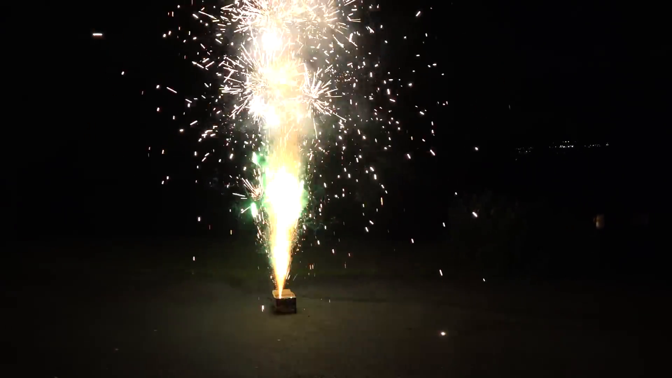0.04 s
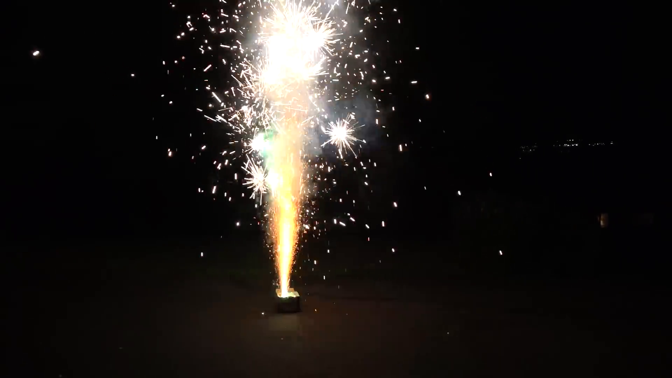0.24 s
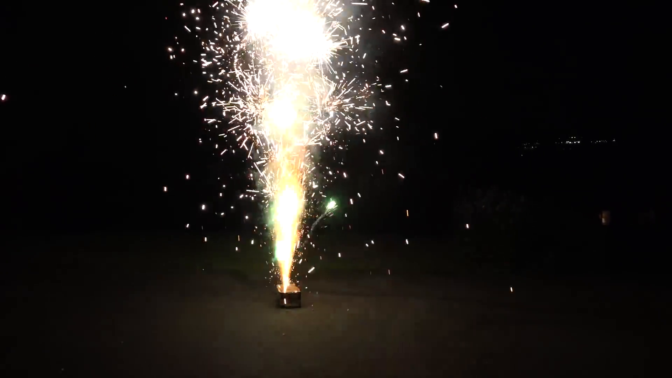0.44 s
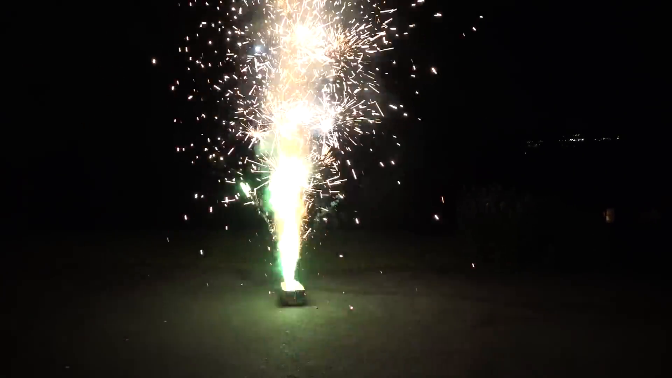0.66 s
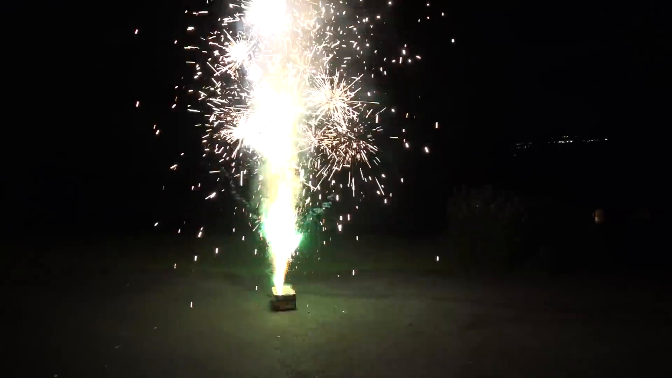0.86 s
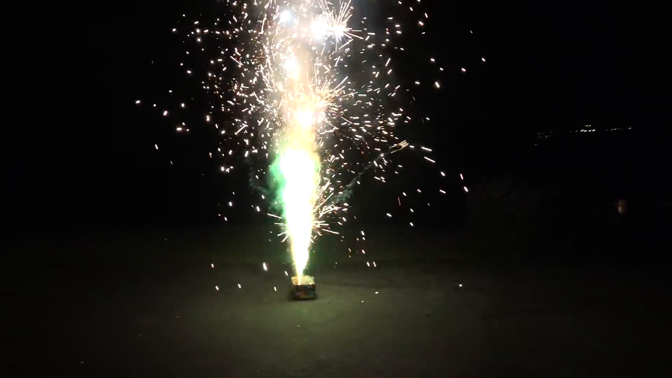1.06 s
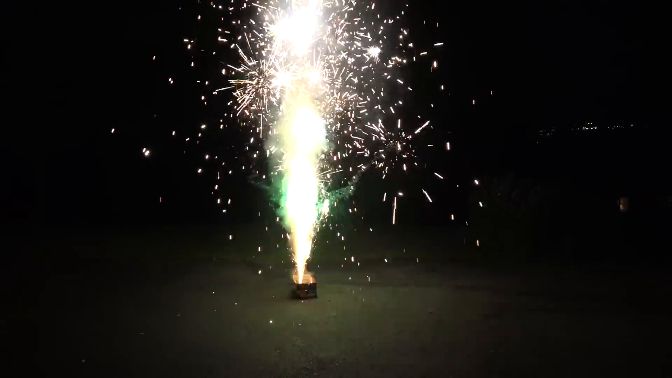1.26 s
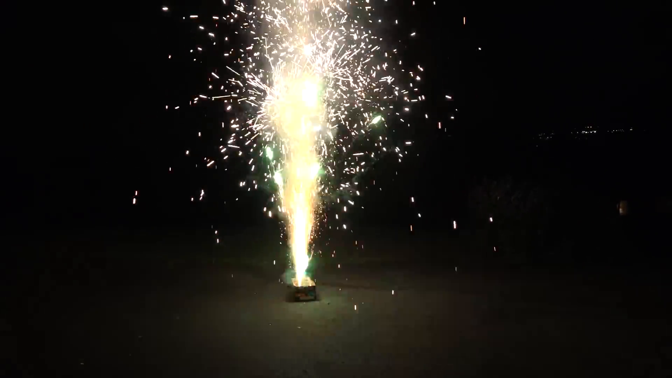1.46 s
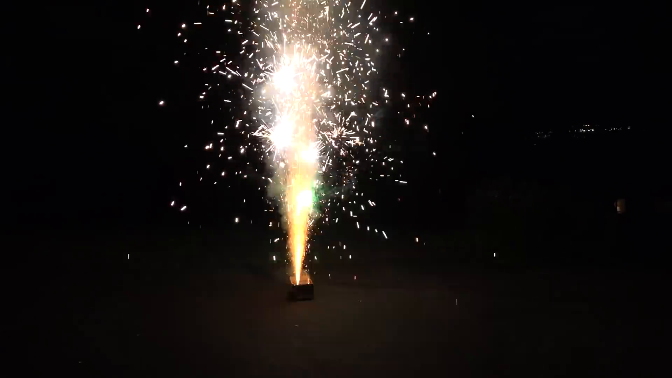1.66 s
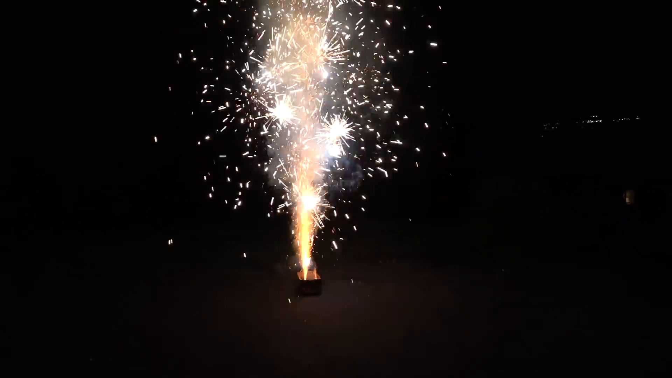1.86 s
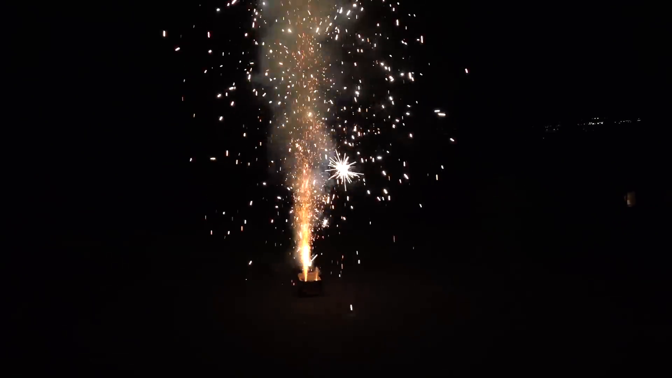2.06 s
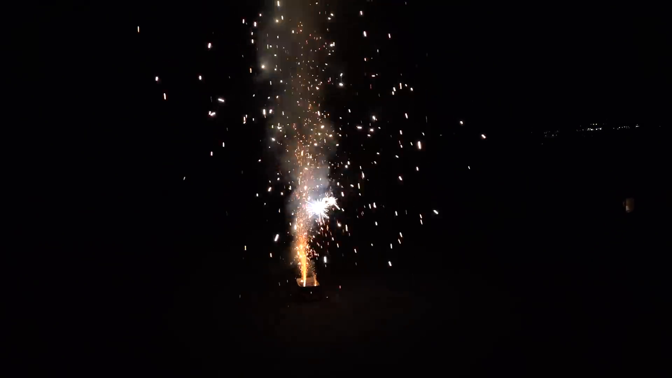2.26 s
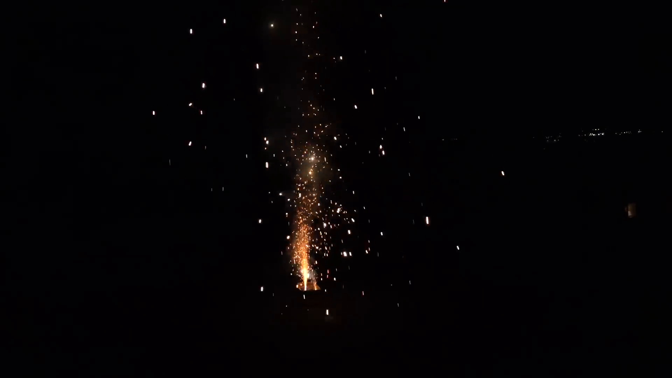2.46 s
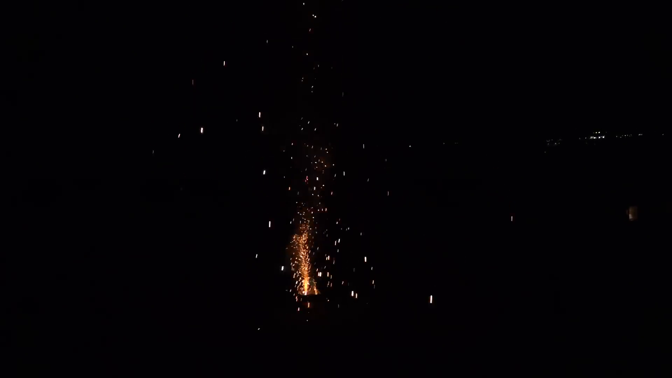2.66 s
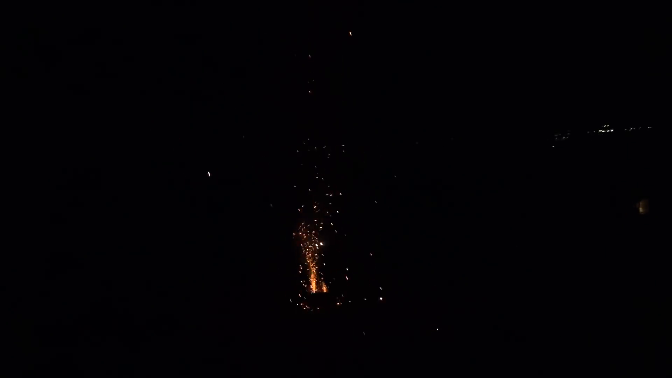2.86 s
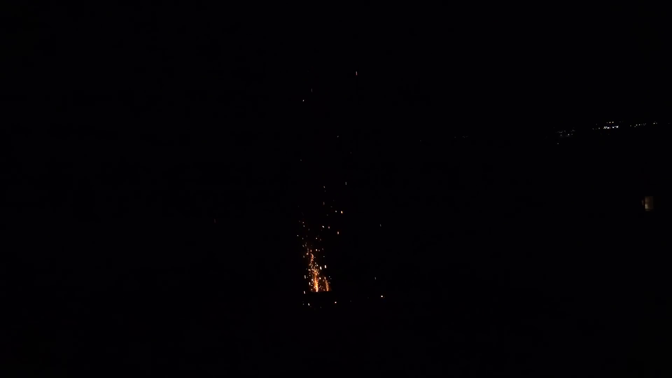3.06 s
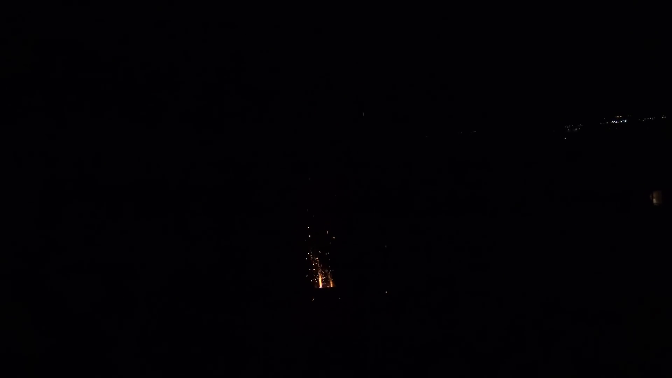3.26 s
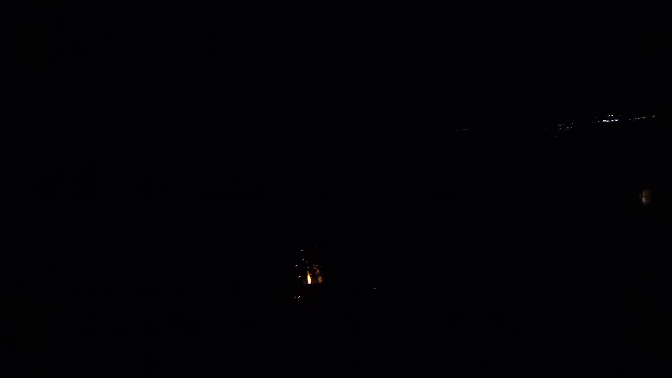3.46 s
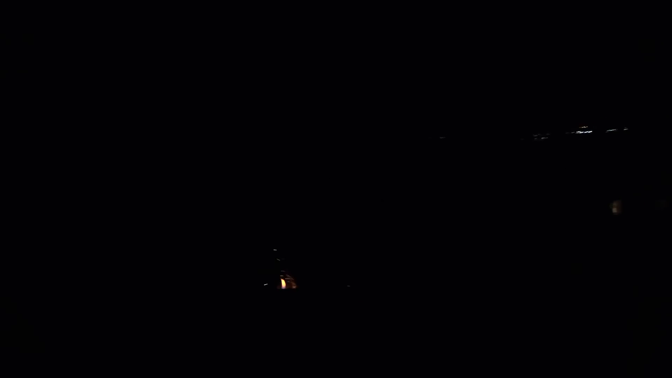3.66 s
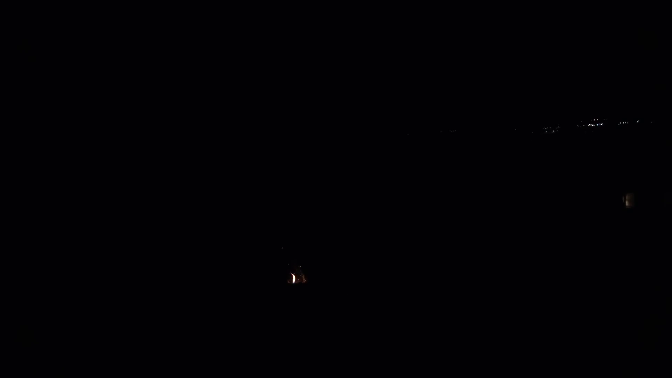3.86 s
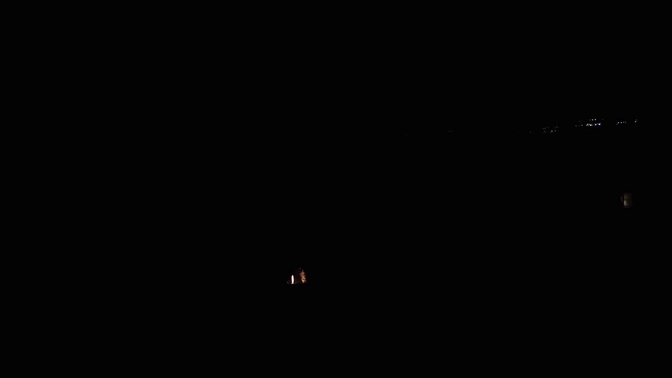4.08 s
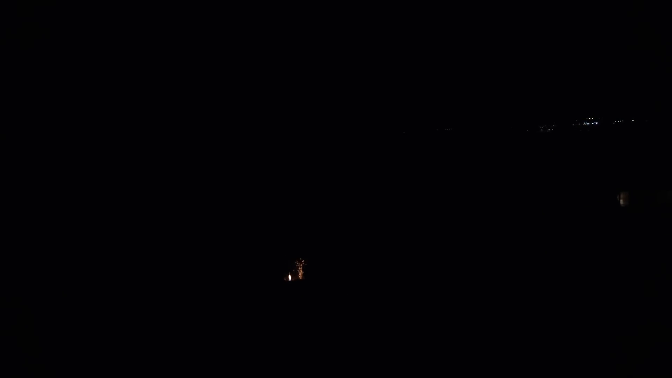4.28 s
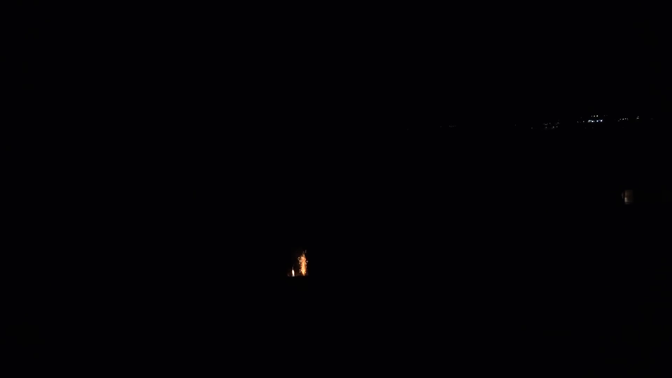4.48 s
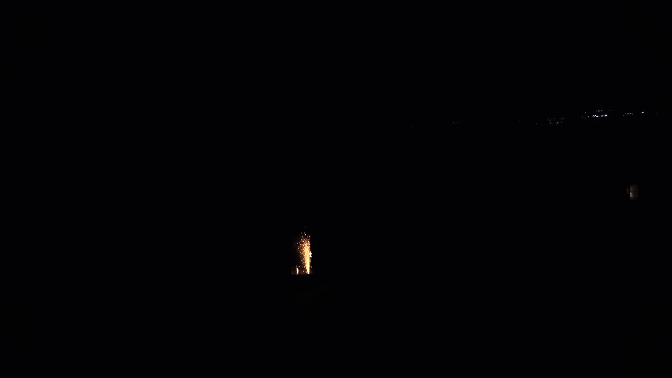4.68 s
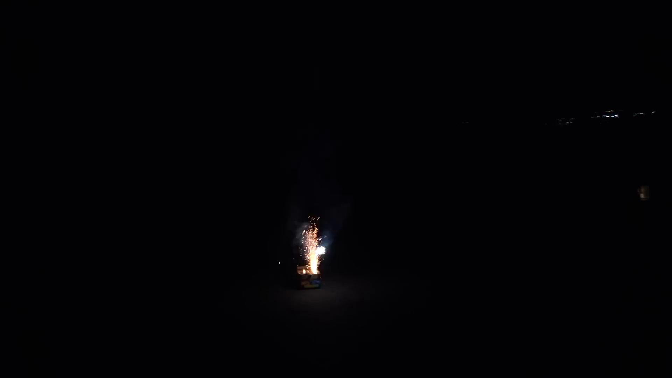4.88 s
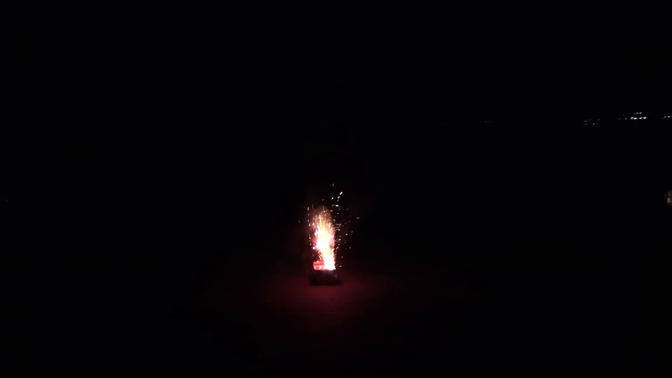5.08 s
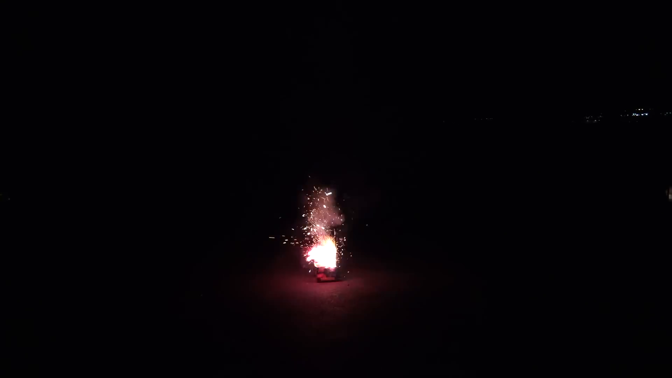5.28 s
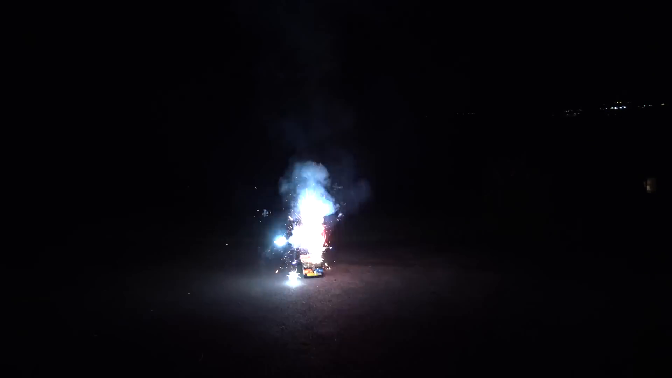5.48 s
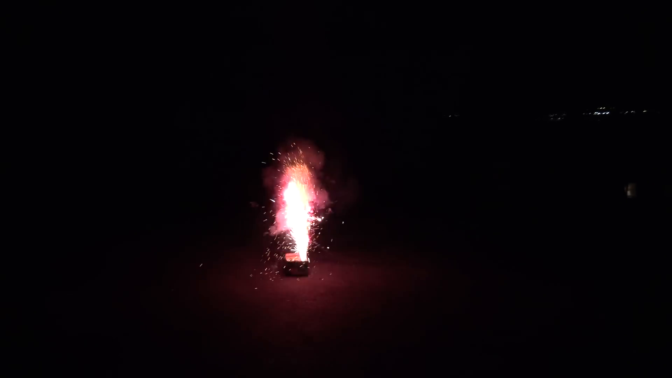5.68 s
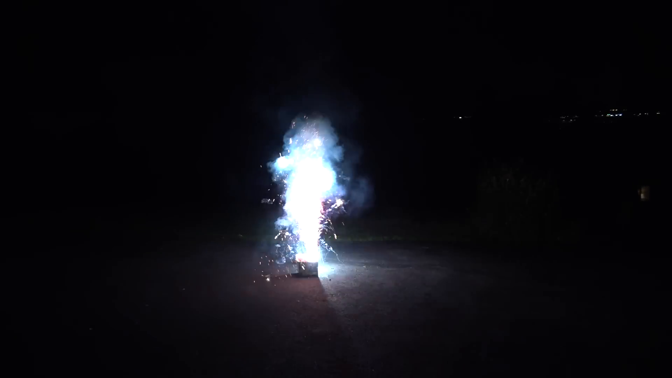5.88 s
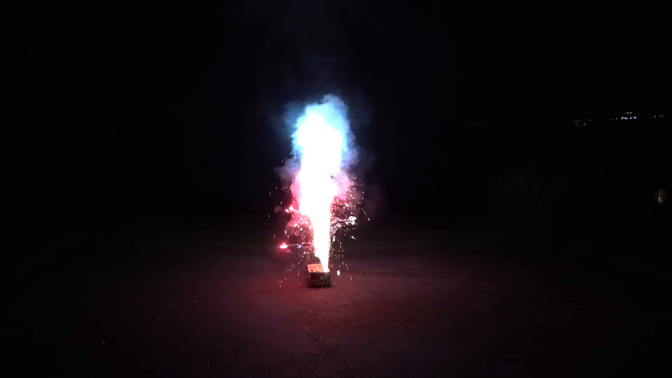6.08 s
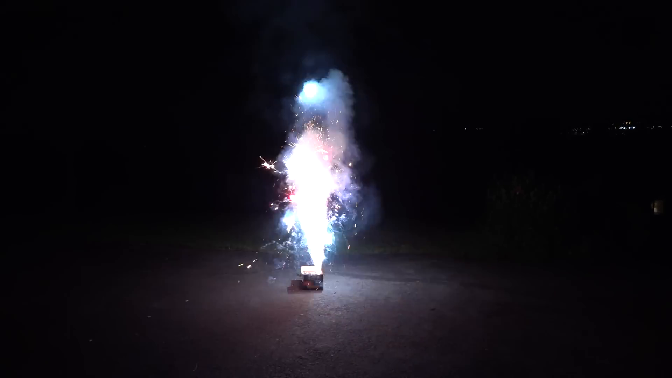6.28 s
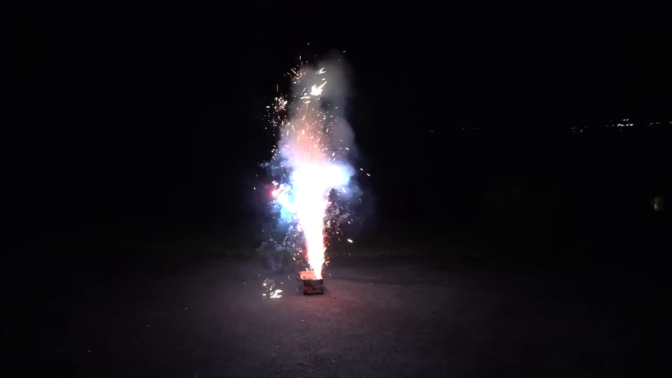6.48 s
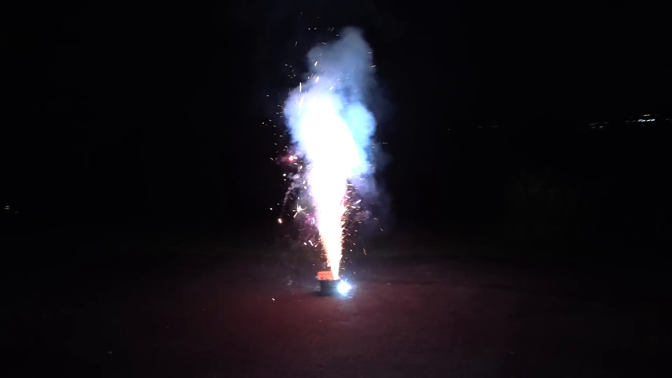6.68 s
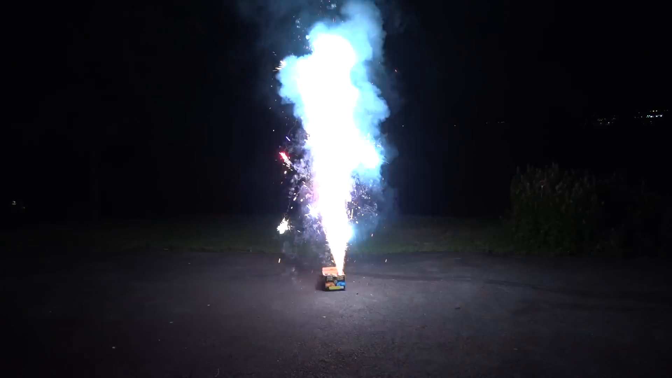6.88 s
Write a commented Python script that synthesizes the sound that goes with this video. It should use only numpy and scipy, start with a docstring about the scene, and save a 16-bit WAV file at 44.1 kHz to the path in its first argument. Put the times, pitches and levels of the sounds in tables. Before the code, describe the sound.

Dense crackling sparks from a ground firework die away, a far engine drones, and the firework reignites, popping into a fluttering roar.

```python
"""A ground firework fountain at night: a hissing jet throws sparks that burst in a dense crackle.
The charge burns out, and a faint fizz creeps through the cardboard tube while an engine drones far off.
Then the next charge catches with a fizz, hollow pops of burning lumps and low thumps of gas,
and swells into a fluttering roar. The yard and a wall across it add a thin echo."""
import sys
import numpy as np
from scipy import signal
from scipy.fft import rfft, irfft
from scipy.io import wavfile

SR = 44100
rng = np.random.default_rng(int(sys.argv[2]) if len(sys.argv) > 2 else 0)


def to_wav(s):
    """Save 16-bit WAV."""
    ch = np.atleast_2d(s).T  # columns
    pcm = np.round(np.clip(ch, -1, 1) * 32767)  # PCM
    wavfile.write(sys.argv[1], SR, pcm.astype(np.int16))


N = 306045
TIME = np.arange(N) / SR

# The first charge's shower of sparks surges and chokes: time_s, strength_db
SHOWER_STRENGTH = [(0.0, -29), (0.01, -25.5), (0.104, -28.5), (0.344, -23), (0.36, -28.5), (0.46, -25.5),
                   (0.476, -36.5), (0.528, -24), (0.632, -24.5), (0.648, -34), (0.664, -25), (0.836, -23.5),
                   (0.852, -33.5), (0.868, -24.5), (0.952, -27), (0.959, -21), (0.969, -44), (0.978, -22.5),
                   (1.001, -23), (1.011, -34), (1.02, -23.5), (1.146, -28), (1.246, -22.5), (1.386, -27),
                   (1.408, -20.5), (1.434, -27), (1.644, -23.5), (1.648, -34), (1.706, -21.5),
                   (1.716, -38.5), (1.737, -23.5), (1.88, -29.5)]
# Big sparks, called stars, burst with one sharp crack each: start_s, level_db
STAR_BURSTS = [(.2184, -5), (.3447, -7.5), (.4266, -3.5), (.457, -9.5), (.529, -8), (.575, -12),
               (.7492, -20), (.7887, -16), (.8654, -9), (.9782, -23), (.9844, -17), (1.1248, -10),
               (1.2027, -3.5), (1.2246, -9), (1.3087, -11), (1.3276, -12), (1.4, -11), (1.4464, -13),
               (1.4614, -7), (1.7639, -12), (1.7938, -20), (1.8137, -12), (1.851, -7), (1.8671, -14),
               (1.8759, -14), (1.8835, -12), (1.9693, -22), (1.975, -10), (1.977, -15), (1.9941, -16),
               (1.9969, -9), (2.0014, -15), (2.0038, -6), (2.0054, -31), (2.0091, -26), (2.0261, -9.5),
               (2.0274, -15), (2.0284, -10), (2.0346, -14), (2.0378, -17), (2.1676, -25), (2.1743, -14),
               (2.1764, -12.5)]
# Burning lumps pop as the tube spits them out:
# start_s, snap_db, bubble_pitch_hz, bubble_db, cavity_pitch_hz, cavity_db, sizzle_db
LUMP_POPS = [(0.8356, -17, 520, -26, 2000, -31, -29), (1.9032, -20, 650, -29.5, 4770, -21, -40),
             (2.1312, -36, 620, -38, 4500, -41, -52), (2.276, -38, 613, -42, 4470, -58.5, -59),
             (2.3838, -49, 710, -35, 4470, -33, -54), (2.3922, -53, 705, -37, 4600, -33.5, -54),
             (2.795, -48, 900, -49, 4700, -43, -49), (4.6324, -45, 700, -44, 1800, -38, -45),
             (4.6788, -37, 957, -35, 4540, -29, -48), (4.6952, -34, 770, -34, 4700, -34, -43),
             (4.7935, -32, 860, -32.5, 4460, -26, -40), (4.889, -36, 706, -32, 4830, -30, -40),
             (4.8989, -33, 950, -28, 4630, -30, -40), (4.9214, -22, 800, -44, 3840, -29, -39),
             (4.9651, -29, 800, -38, 1830, -31, -38), (5.0639, -25, 800, -35, 1880, -34, -34),
             (5.1152, -49, 600, -46, 1610, -40, -54), (5.152, -32, 1000, -24.5, 2300, -47, -34),
             (5.232, -37, 1020, -31, 1740, -36, -36), (5.2841, -28, 800, -36, 3950, -21, -40),
             (5.3774, -20, 840, -25, 1720, -31, -39), (5.3864, -24, 760, -28, 3530, -30, -40),
             (5.447, -31.5, 800, -34, 3510, -27, -52), (5.473, -21, 870, -24.5, 1290, -33, -35),
             (5.5197, -33, 835, -24, 4000, -24, -32.5), (5.6867, -21, 795, -27, 3600, -24, -35),
             (5.7116, -24, 750, -19.5, 1280, -33, -38), (5.9197, -17, 870, -17, 2150, -24, -29.5),
             (5.939, -27, 920, -19.5, 2680, -25, -36), (5.9477, -15, 700, -37, 2350, -25, -39),
             (6.123, -17, 980, -20.5, 3080, -25, -34), (6.248, -20, 980, -19, 4540, -28, -32),
             (6.3201, -9, 760, -23, 5200, -23, -31), (6.3445, -17, 850, -22, 2400, -21, -33),
             (6.3512, -11, 700, -23, 2420, -25, -35), (6.448, -9, 730, -29, 3510, -35, -42),
             (6.4508, -13, 735, -38, 3510, -36, -41), (6.4562, -11.5, 990, -26, 3600, -30, -30),
             (6.4868, -15, 470, -29, 4830, -21, -30), (6.7119, -11, 800, -35, 4600, -30, -28),
             (6.754, -11, 716, -19, 1490, -21.5, -28), (6.788, -12, 800, -21, 2400, -26, -34)]
# The far engine speeds up and grows louder: time_s, firing_rate_hz, level_db
ENGINE_RUN = [(1.9, 94.5, -62), (2.402, 100, -54.5), (3.001, 106.5, -52), (4.1, 114.1, -51),
              (6.94, 121.2, -47)]
# The engine's tones: multiple_of_firing_rate, level_db
ENGINE_TONES = [(1, -4.5), (2, -20.5), (3, -22.5)]
# Gulps of gas leave the tube: start_s, pitch_hz, level_db
GAS_GULPS = [(2.385, 560, -43), (4.889, 260, -33), (4.966, 249, -24), (5.067, 208, -24.5),
             (5.118, 243, -34), (5.154, 228, -27), (5.224, 204, -26.5), (5.267, 230, -26),
             (5.394, 250, -24.5), (5.522, 269, -28), (5.687, 237, -26), (5.7, 207, -19),
             (5.761, 220, -20.5), (5.845, 240, -22.5), (5.922, 239, -16.5), (5.948, 287, -21),
             (6.233, 255, -20.5), (6.251, 228, -25), (6.306, 266, -17), (6.348, 245, -22),
             (6.377, 235, -24), (6.620, 214, -16)]
# The fire in the tube flares and sinks back: start_s, length_s, boost_db
FIRE_FLARES = [(2.93, 0.34, 3.5), (3.513, 0.63, 2.5), (4.872, 0.13, 3), (5.23, 0.37, 3.5),
               (5.498, 0.1, 2.5), (5.614, 0.48, 3.5), (6.05, 0.35, 2)]
# The sinking sizzle of the primer, which lights the second charge: time_s, pitch_hz
PRIMER_PITCH = [(4.6, 4700), (4.79, 4550), (4.87, 4170), (5.1, 4020), (5.398, 3600)]
# Where the tube rings: pitch_hz, width_hz, boost_db
TUBE_RINGS = [(2380, 320, 2.5), (3600, 210, 8), (4620, 210, 8), (8000, 300, 6.5)]

# Each sound's tone colour, or how strong it is from bass to treble: frequency_hz, level_db
JET_SPECTRUM = [(30, -18), (120, -11), (250, -11.5), (600, -6.5), (1600, -6), (3200, -1.5), (4600, 1),
                (5800, 1), (6900, -5), (8100, -2), (9300, -8), (11000, -17.5)]  # gas rushing from the nozzle
CRACK_SPECTRUM = [(30, -42), (120, -13), (260, 1.5), (450, -5.5), (700, -1), (2000, -0.5), (3200, -2),
                  (5600, 3.5), (6300, 1), (6880, -9.5), (7850, 3.5), (8400, 2), (9300, -5.5), (11000, -15)]  # a spark bursting
SPLINTER_SPECTRUM = [(60, -20), (250, 0.5), (700, -10), (2000, 2), (5500, 0), (6900, -17), (8100, 0),
                     (11000, -23)]  # a star breaking up
POP_SPECTRUM = [(30, -13), (130, -8), (300, -3), (800, -4), (1500, 6), (2400, 3), (4600, 2), (5800, 6),
                (6750, -21), (7500, -10), (8600, -10.5), (11000, -24)]  # a lump snapping
SIZZLE_SPECTRUM = [(100, -31), (400, -9), (900, 1), (1500, 2), (2400, 10), (3500, 2), (4400, 2), (5500, 7),
                   (6800, -0.5), (8000, 3), (11000, -14)]  # crumbs inside the tube
RUMBLE_SPECTRUM = [(20, -30), (55, -12), (85, -5.5), (135, -1), (210, -3), (265, -14.5), (350, -14.5),
                   (430, -23.5), (900, -23), (3000, -50)]  # the far engine
FIZZ_SPECTRUM = [(200, -14), (500, -13), (850, -1.5), (1300, -4), (2000, -9), (2500, -2), (3550, -1),
                 (4100, -0.5), (4600, -2.5), (5600, -6.5), (6750, -15), (7900, -11), (9000, -19),
                 (11000, -48)]  # the creeping fire
PRIMER_SPECTRUM = [(200, -7), (500, -13), (800, 2), (1300, -5), (2000, -2), (2600, 3.5), (3400, 6),
                   (4500, 4.5), (5500, -2.5), (6600, -13.5), (7700, -3), (9000, -17), (9700, -32),
                   (11000, -37)]  # the primer's fizz
FLAME_SPECTRUM = [(400, -20), (1200, -19.5), (1900, -6.5), (3000, -0.5), (3300, -6), (4200, -3.5),
                  (5000, -9), (5800, -8.5), (6750, -13), (7300, -10), (8500, -16), (9600, -22.5),
                  (11000, -32)]  # the second charge's hiss
ROAR_SPECTRUM = [(25, -38), (70, -12.5), (160, -2), (280, -3), (480, -7), (750, -4.5), (1000, -9.5),
                 (1500, -12.5), (2500, -26.5), (6000, -68)]  # its low roar, and the puff of each pop

# How long the yard's echo takes to fade by 60 dB: frequency_hz, fade_s
YARD_FADE = [(150, 0.95), (1000, 0.19), (4000, 0.72), (10000, 0.026)]
# How strong the left-right difference is against what both sides share: frequency_hz, difference_db
SPRAY_WIDTH = [(60, 3), (130, 2.5), (250, -6.5), (700, -10.5), (1200, -19.5), (2200, -27), (3200, -29),
               (4000, -25), (5300, -19.5), (6300, -12), (7100, -4), (7800, -7.5), (8900, -7), (11000, -3)]  # sparks high up
GROUND_WIDTH = [(60, -21), (180, -19), (340, -27), (800, -17), (1150, -20.5), (2200, -30), (3000, -26),
                (3600, -28), (4200, -24), (5300, -20), (6200, -8), (6900, -7), (7800, -12), (8900, -7),
                (11000, -1.5)]  # the tube on the ground
ENGINE_WIDTH = [(100, -29.0), (400, -12.0), (1500, -10)]  # the engine, arriving by many paths
# How much louder the left side is than the right: frequency_hz, level_db
LEFT_BOOST = [(60, 1.5), (150, -1.1), (650, 1.3), (1100, -.1), (2200, -.1), (3500, -.3), (5300, -.1),
              (6500, -1.5), (7000, 7), (7600, 1.2), (8600, 4.2), (11000, 1.5)]
# How far the left side's wave runs ahead of the right's: frequency_hz, lead_radians
LEFT_LEAD = [(4800, -0.066), (6000, 0.052), (6800, 0.38), (7500, 0.49), (8200, 0.18), (9200, -0.16),
             (10500, -1)]

BURNOUT_S, LAST_SPARKS_S = 1.825, 1.865  # the first charge's jet fails, then its sparks
ALIGHT_S, CATCH_DB_PER_S = 4.8, 64  # when the second charge is alight, and how fast it gets there
HISS_DB, HISS_DB_PER_S = -50.5, 11.5  # its hiss: level once alight, and growth
TREBLE_LIMIT_HZ = 11100


def amp(db):
    """Turns decibels into a gain to multiply by."""
    return 10 ** (np.asarray(db) / 20)


def normalised(x):
    """Scales a signal to an average (rms) level of 1."""
    return x / np.sqrt(np.mean(x ** 2) + 1e-20)


def look_up(table, hz):
    """Reads between a table's rows, giving every octave equal room."""
    row_hz, value = np.transpose(table)
    return np.interp(np.log(hz + 1), np.log(row_hz + 1), value)


def wander(hz):
    """A random wobble of level 1, mostly slower than the given rate."""
    f = np.fft.rfftfreq(N, 1 / SR)
    white = rfft(rng.standard_normal(N))
    return normalised(irfft(white * f / (f + hz / 10) / (1 + (f / hz) ** 2), N))


def colour(x, spectrum, size=4096):
    """Gives a sound a tone colour; a click of height 1 still peaks at 1."""
    hz = abs(np.fft.fftfreq(size, 1 / SR))
    log_gain = np.log(amp(look_up(spectrum, hz)))
    log_gain -= 2 * np.clip((hz - TREBLE_LIMIT_HZ) / 2000, 0, 1)
    # this step makes the filter ring only after a click, never before it
    kernel = np.fft.ifft(np.exp(np.conj(signal.hilbert(log_gain)))).real[:size // 2]
    return signal.oaconvolve(x, kernel[None] / abs(kernel).max(), axes=1)[:, :N]


def noise(spectrum):
    """Noise of level 1 in two rows: what left and right share, and how they differ."""
    return normalised(colour(rng.standard_normal((2, N)), spectrum))


def shocks(sizes, spectrum):
    """Sharp jumps in air pressure, each leaning left or right at random."""
    sides = rng.choice([-1., 1.], N)
    return colour(-sizes * np.array([np.ones(N), sides]), spectrum)


def grains(per_s, spread_db, spectrum):
    """A crackle of level 1: small random shocks, a few larger than the rest."""
    sizes = amp(spread_db * np.minimum(rng.exponential(1, N), np.pi))
    return normalised(shocks(sizes * (rng.random(N) < per_s / SR), spectrum))


def clicks(rows):
    """One click for each row of start_s, level_db."""
    start_s, db = np.transpose(rows)
    return np.bincount(np.clip(np.round(start_s * SR).astype(int), 0, N - 1), amp(db), N)


def dying(rows, decay_s):
    """A gain that jumps at each row of start_s, level_db and dies away."""
    return signal.lfilter([1], [1, -np.exp(-1 / (decay_s * SR))], clicks(rows) + 1e-12)


def hold(start_s, end_s, rise_db_per_s, fall_db_per_s):
    """A gain that reaches 1 at start_s, stays there and falls after end_s."""
    early_s, late_s = np.maximum(start_s - TIME, 0), np.maximum(TIME - end_s, 0)
    return amp(-rise_db_per_s * early_s - fall_db_per_s * late_s)


def add(mix, start_s, sound):
    """Places a sound in the row that left and right share."""
    part = mix[0, round(start_s * SR):][:len(sound)]
    part += sound[:len(part)]


def flow(usual_db=-24):
    """The flow through the nozzle surges and chokes; 1 is its usual strength."""
    time_s, db = np.transpose(SHOWER_STRENGTH)
    return amp(np.interp(TIME, time_s, db) - usual_db)


def jet(hiss_db=-31.0, crackle_db=-30.5, flutter_db=1.4, sag_db_per_s=0.97):
    """Gas and tiny crackling sparks rush out of the nozzle until the first charge is spent."""
    hiss = amp(hiss_db) * noise(JET_SPECTRUM)
    crackle = amp(crackle_db) * grains(per_s=1800, spread_db=9.0, spectrum=JET_SPECTRUM)
    strength = hold(0, BURNOUT_S, 0, fall_db_per_s=46) * flow() ** 0.36
    return (hiss + crackle) * strength * amp(flutter_db * wander(hz=40) - sag_db_per_s * TIME)


def sparks(per_s=470, top_db=-7.5, range_db=17.5, splinter_db=-15.0, ember_db=-42):
    """Sparks burst in clumps; the big stars also splinter and leave hissing embers."""
    clumps = np.exp(.33 * wander(hz=130))
    shower = hold(0, LAST_SPARKS_S, 0, fall_db_per_s=430) * flow()
    rate = per_s * shower ** 2 * clumps / clumps.mean()  # more flow means more cracks, not louder ones
    sizes = amp(top_db - range_db * rng.random(N)) * (rng.random(N) < rate / SR)
    splinters = amp(splinter_db) * dying(STAR_BURSTS, decay_s=.0025) * grains(3000, 3.2, SPLINTER_SPECTRUM)
    embers = amp(ember_db) * dying(STAR_BURSTS, decay_s=.049) * noise(JET_SPECTRUM)
    return shocks(sizes + clicks(STAR_BURSTS), CRACK_SPECTRUM) + splinters + embers


def tube(x):
    """The cardboard tube rings at a few pitches, boosting them in a sound that passes through."""
    return x + sum((amp(db) - 1) * signal.lfilter(*signal.iirpeak(hz, hz / width_hz, SR), x)
                   for hz, width_hz, db in TUBE_RINGS)


def knock(hz, cycles):
    """A hollow tone that swells over the given number of cycles and quickly dies."""
    turns = hz * TIME[:SR // 25]
    return np.sin(2 * np.pi * turns) * turns / cycles * np.exp(1 - turns / cycles)


def pops(snap_gain_db=-1, sizzle_gain_db=1, puff_gain_db=-13):
    """A lump snaps: its bubble of hot gas swings and puffs, its cavity rings, its crumbs sizzle."""
    times, snap_db, _, bubble_db, _, _, sizzle_db = np.transpose(LUMP_POPS)
    tones = np.zeros((2, N))
    for start_s, _, bubble_hz, db, cavity_hz, cavity_db, _ in LUMP_POPS:
        bubble = amp(db) * knock(bubble_hz, cycles=0.56)
        cavity = amp(cavity_db) * knock(cavity_hz, cycles=1.66)
        add(tones, start_s, bubble - cavity)
    snaps = amp(snap_gain_db) * tube(shocks(clicks(np.c_[times, snap_db]), POP_SPECTRUM))
    crumbs = normalised(tube(grains(3500, 3.5, SIZZLE_SPECTRUM)))
    sizzle = amp(sizzle_gain_db) * dying(np.c_[times, sizzle_db], decay_s=0.01) * crumbs
    puffs = amp(puff_gain_db) * dying(np.c_[times, bubble_db], decay_s=0.013) * noise(ROAR_SPECTRUM)
    return snaps + tones + sizzle + puffs


def engine(rumble_db=2.5, throb_db=3.0, hum_hz=161, hum_db=-8):
    """A far engine slowly gains speed: wavering low tones in a dull rumble, beside a separate hum."""
    time_s, firing_hz, level_db = np.transpose(ENGINE_RUN)
    pace = 1 + 0.0083 * wander(hz=6.2)
    firings = np.cumsum(np.interp(TIME, time_s, firing_hz) * pace) / SR
    tones = [(multiple * firings, db) for multiple, db in ENGINE_TONES]
    tones.append((np.cumsum(hum_hz * pace) / SR, hum_db))
    sound = amp(rumble_db) * noise(RUMBLE_SPECTRUM)
    for turns, db in tones:
        sound[0] += amp(db + throb_db * wander(hz=3.8)) * np.sqrt(2) * np.sin(2 * np.pi * turns)
    return sound * amp(np.interp(TIME, time_s, level_db))


def thumps(swell_s=0.0012):
    """Gulps of gas leave the tube with a short, low whump."""
    sound, t = np.zeros((2, N)), TIME[:SR // 25]
    swell = t / swell_s * np.exp(1 - t / swell_s)
    for start_s, hz, db in GAS_GULPS:
        add(sound, start_s, amp(db) * np.cos(2 * np.pi * hz * t) * swell)
    return sound


def flaring():
    """The gain of the fire's flares: each swells quickly and sinks back."""
    boost_db = 0
    for start_s, length_s, db in FIRE_FLARES:
        progress = np.clip((TIME - start_s) / length_s, 0, 1)
        boost_db += db * np.sqrt(np.sin(np.pi * progress).clip(0))
    return amp(boost_db)


def fizz(level_db=-58, full_s=2.486, fade_db_per_s=25, flutter_db=1):
    """The fire creeps on inside the tube, which colours its faint hiss."""
    hiss = normalised(tube(noise(FIZZ_SPECTRUM)))
    creep = amp(level_db) * hold(full_s, ALIGHT_S, fade_db_per_s, fade_db_per_s)
    return hiss * creep * flaring() * amp(flutter_db * wander(hz=30))


def resonate(x, hz, width_hz):
    """Picks out a narrow band of a sound around a moving pitch."""
    spin = np.exp(2j * np.pi * np.cumsum(hz) / SR)
    decay = np.exp(-np.pi * width_hz / SR)
    return 2 * (spin * signal.lfilter([1 - decay], [1, -decay], x / spin)).real


def primer(level_db=-44.0, full_s=4.72, sizzle_db=-5.0, flutter_db=2.5):
    """The second charge's primer fizzes up; its sizzle wavers and sinks as the vent burns open."""
    time_s, hz = np.transpose(PRIMER_PITCH)
    gas = noise(PRIMER_SPECTRUM)
    pitch_hz = np.interp(TIME, time_s, hz) * (1 + 0.017 * wander(hz=22))
    sizzle = amp(sizzle_db) * resonate(gas, pitch_hz, width_hz=480)
    swell = hold(full_s, full_s, rise_db_per_s=50, fall_db_per_s=9) * flaring()
    return normalised(gas + sizzle) * swell * amp(level_db + flutter_db * wander(hz=30))


def burning(alight_db, db_per_s):
    """The gain of the second charge: it catches, grows steadily and flares now and then."""
    age_s = TIME - ALIGHT_S
    catching_db = CATCH_DB_PER_S * np.minimum(age_s, 0)
    growing_db = db_per_s * np.maximum(age_s, 0)
    return amp(alight_db + catching_db + growing_db) * flaring()


def flame(flutter_db=2.0, spit_db=-11.0, spits_per_s=260):
    """The second charge hisses; uneven burning shakes its roar and spits small grains in spurts."""
    flutter = wander(hz=50)
    blast = burning(alight_db=-48.5, db_per_s=10.5)
    hiss = normalised(tube(noise(FLAME_SPECTRUM))) * burning(HISS_DB, HISS_DB_PER_S)
    roar = noise(ROAR_SPECTRUM) * blast * amp(flutter_db * flutter)
    spits = tube(grains(spits_per_s * np.exp(flutter / 2), 1.5, POP_SPECTRUM))
    return hiss + roar + amp(spit_db) * blast * spits


def ticks(gain_db=-9, per_s=90, spread_db=3):
    """Stray sparks of the second charge tick sharply through its hiss."""
    return amp(gain_db) * burning(HISS_DB, HISS_DB_PER_S) * grains(per_s, spread_db, CRACK_SPECTRUM)


def wall(x, delay_s=0.0467, smear_s=0.011, level_db=-13.5, dull_above_hz=6050):
    """A wall across the yard throws back one smeared, dull echo."""
    t = TIME[:SR // 10]
    bounces = rng.standard_normal(len(t)) * np.exp(-((t - delay_s) / smear_s) ** 2 / 2)
    echo = signal.lfilter(*signal.butter(2, dull_above_hz, fs=SR), bounces / np.linalg.norm(bounces))
    return amp(level_db) * signal.oaconvolve(x, echo[None], axes=1)[:, :N]


def yard(x, bounces_per_s=2000, size=256):
    """Scattered bounces off the ground and yard make a thin echo; the highest treble dies first."""
    bounces = rng.standard_normal(SR // 2) * (rng.random(SR // 2) < bounces_per_s / SR)
    hz, t, bands = signal.stft(bounces, SR, nperseg=size)
    fade = amp(-60 * t / look_up(YARD_FADE, hz)[:, None])
    tail = signal.istft(bands * fade, SR, nperseg=size)[1]
    return signal.oaconvolve(x, tail[None] / np.linalg.norm(tail), axes=1)[:, :N]


def stereo(x, width):
    """Turns the shared row and the difference row into left and right."""
    hz = np.fft.rfftfreq(N, 1 / SR)
    shared, apart = rfft(x)
    apart = apart * amp(look_up(width, hz))
    lean = amp(look_up(LEFT_BOOST, hz) / 2) * np.exp(1j * look_up(LEFT_LEAD, hz) / 2)
    return irfft(np.array([(shared + apart) * lean, (shared - apart) / lean]), N)


def scene(echo_db=-20, engine_right_db=0.75):
    """The spray overhead, the burning tube on the ground, their echo and the far engine."""
    spray = sparks() + jet()
    ground = fizz() + primer() + flame() + ticks() + pops() + thumps()
    spray = spray + wall(spray)
    spray, ground = (x + amp(echo_db) * yard(x) for x in (spray, ground))
    far = stereo(engine(), ENGINE_WIDTH) * amp([[-engine_right_db], [engine_right_db]])
    return stereo(spray, SPRAY_WIDTH) + stereo(ground, GROUND_WIDTH) + far


def record(dry):
    """Rounds off the sharpest peaks, then cuts the highest treble."""
    rounded = dry / (1 + (dry / .42) ** 6) ** (1 / 6)
    treble_cut = signal.firwin(511, TREBLE_LIMIT_HZ, window=("kaiser", 9), fs=SR)
    return signal.oaconvolve(rounded, treble_cut[None], "same")


dry = scene()
out = record(dry)
to_wav(out)
```